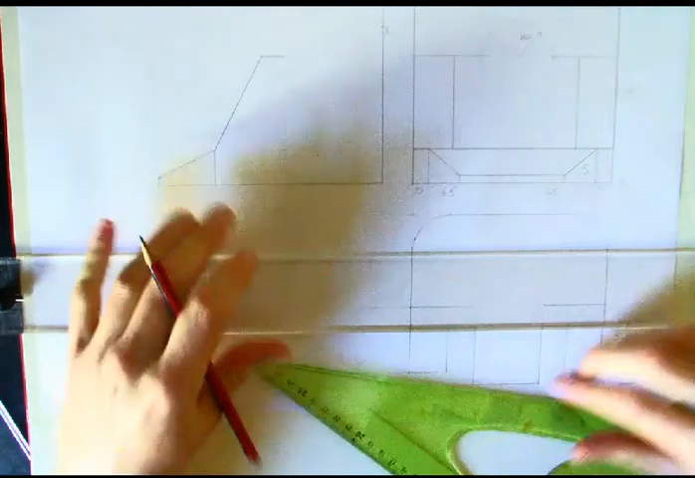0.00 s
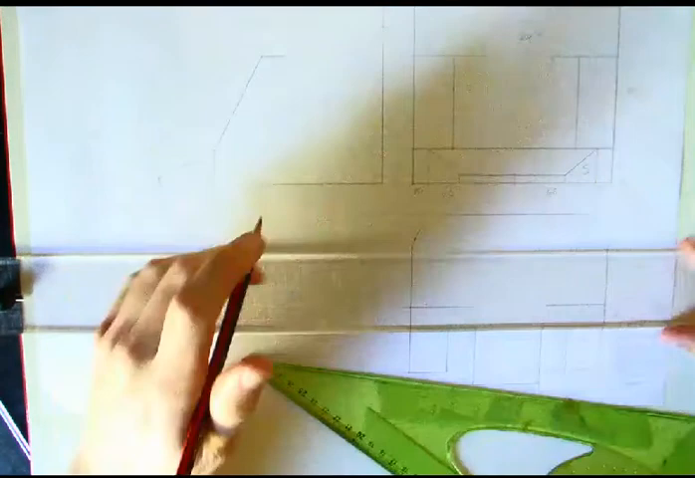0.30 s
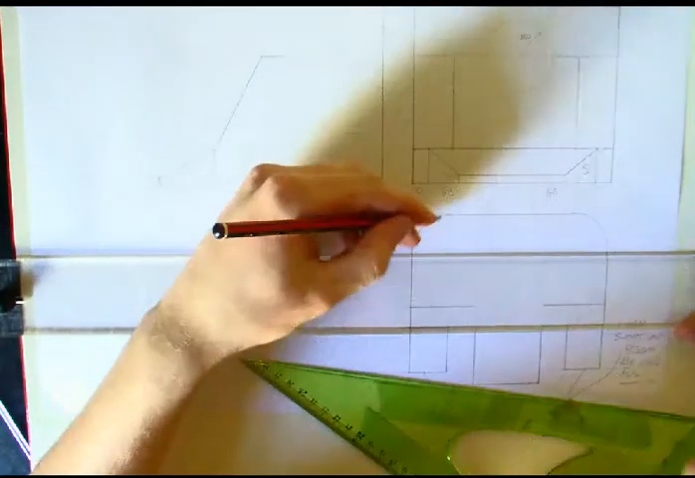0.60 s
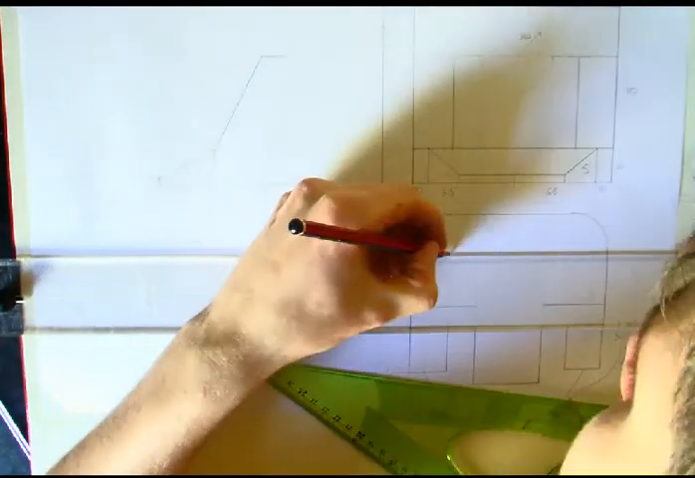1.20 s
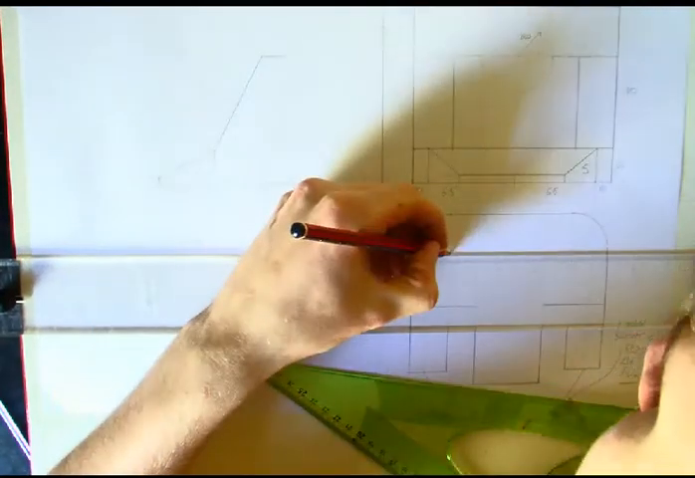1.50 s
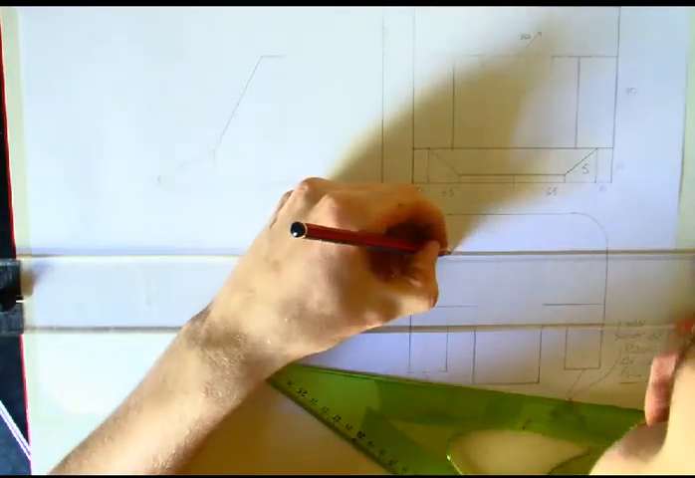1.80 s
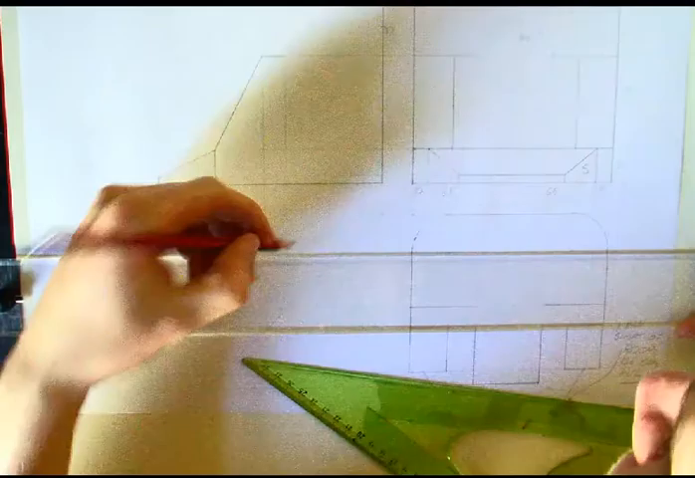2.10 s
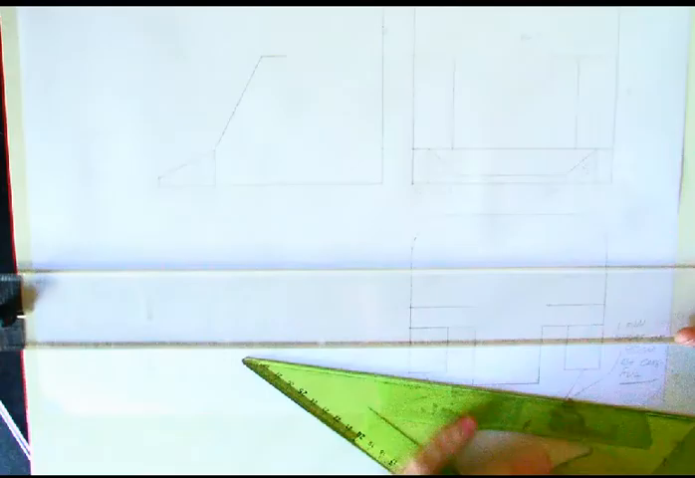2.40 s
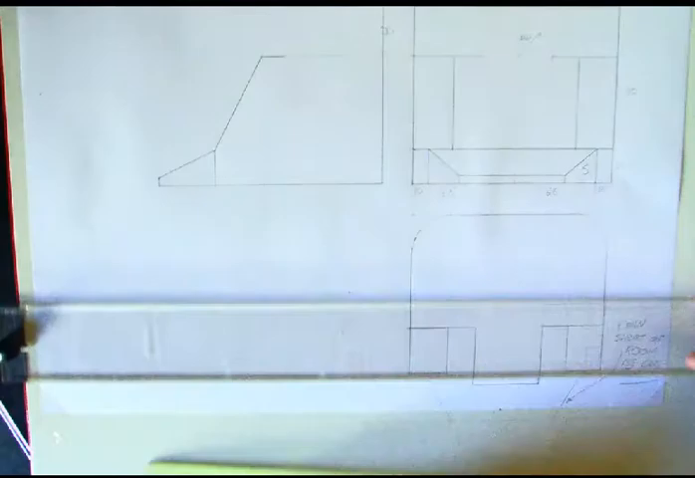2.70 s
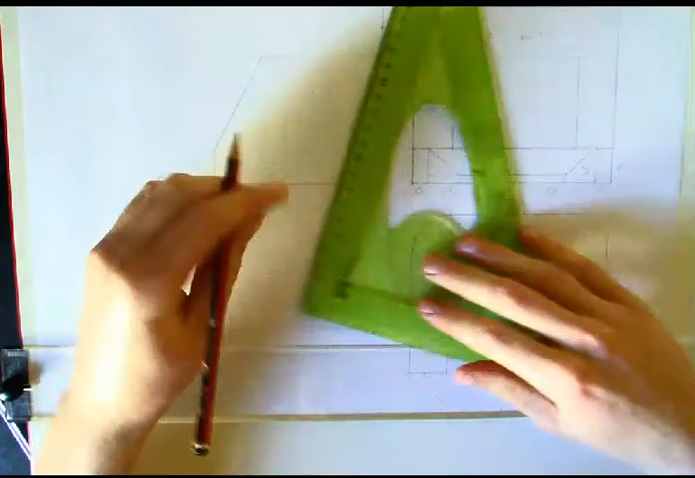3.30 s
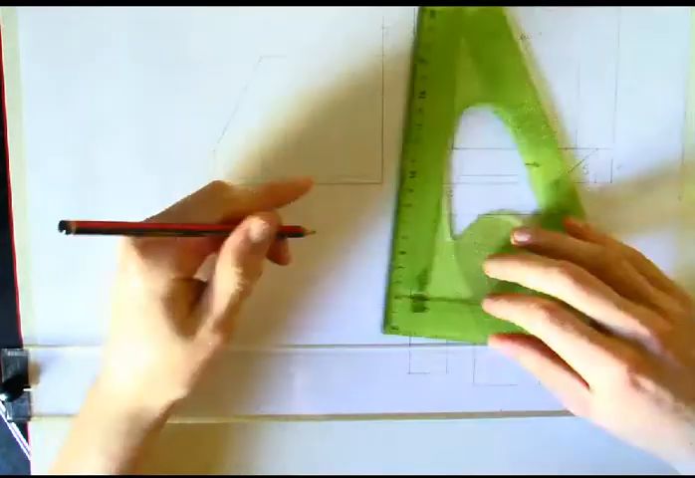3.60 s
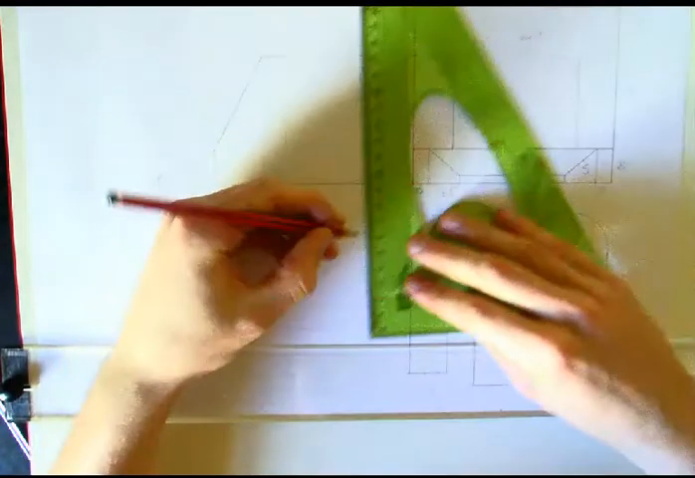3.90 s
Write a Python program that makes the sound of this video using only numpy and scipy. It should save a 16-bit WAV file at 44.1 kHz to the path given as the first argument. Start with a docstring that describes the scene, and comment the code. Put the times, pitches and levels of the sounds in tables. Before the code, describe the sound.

A plastic set square knocks on a drawing board right at the start, followed by faint ticks. A pencil softly scratches one short line around 2 seconds. From 2.4 seconds a hand brushes paper and a straightedge slides with a low rumble. The set square clacks three times between 3 and 3.3 seconds, scuffs at 3.6 and taps at 3.8. Faint room hum lies underneath.

```python
"""Drafting on a paper-covered wooden board in a small quiet room.
An instrument knocks on the board, exciting damped modes, and a few light ticks follow. A pencil draws one
short line, hissing by friction on the paper fibres. The hand brushes away and the straightedge slides down
as the board rumbles under the arm. A plastic set square is picked up, clacks down edge first and then
flat, and slides until it taps the straightedge. Room air, mains hum and a faint whine lie beneath it all."""
import sys
import numpy as np
from scipy import signal
from scipy.fft import rfft, irfft
from scipy.io import wavfile
from scipy.ndimage import uniform_filter1d

SR = 44100
rng = np.random.default_rng(int(sys.argv[2]) if len(sys.argv) > 2 else 0)


def file_out(sig):
    """Save sig as 16-bit WAV at sys.argv[1]."""
    # one column per channel
    cols = np.atleast_2d(sig).T
    # limit, then scale
    lim = np.clip(cols, -1, 1)
    pcm = np.round(lim * 32767).astype(np.int16)
    wavfile.write(sys.argv[1], SR, pcm)


N = 176400
TIME = np.arange(N) / SR


def from_db(db):
    """Amplitude ratio: a factor of ten for every 20 dB."""
    return 10 ** (np.asarray(db) / 20)


def at_hz(points, hz):
    """Interpolation of (frequency [Hz], value) points on a logarithmic frequency axis."""
    f, value = np.transpose(points)
    return np.interp(np.log(hz + 1e-6), np.log(f), value)


def level(points):
    """Amplitude envelope through (time [s], level [dB]) points, silent outside them."""
    s, db = np.transpose(points)
    return from_db(np.interp(TIME, s, db, left=-150, right=-150))


def rms_one(x):
    """Normalisation to unit rms."""
    return x / np.sqrt(np.mean(x ** 2) + 1e-20)


def coloured(x, spectrum):
    """Spectral shaping, normalised to unit rms."""
    return rms_one(irfft(rfft(x) * from_db(at_hz(spectrum, np.fft.rfftfreq(N, 1 / SR))), N))


def decay(t, t60):
    """Exponential damping: 60 dB in each t60, from t = 0."""
    return from_db(-60 * np.maximum(t, 0) / t60)


def resonate(x, bands):
    """Second-order resonances and antiresonances raise or lower narrow bands."""
    for hz, width_hz, db in bands:
        gain, alpha = from_db(db / 2), np.pi * width_hz / SR
        tuning = -2 * np.cos(2 * np.pi * hz / SR)
        numerator = [1 + alpha * gain, tuning, 1 - alpha * gain]
        x = signal.lfilter(numerator, [1 + alpha / gain, tuning, 1 - alpha / gain], x + 1e-18)
    return x


def add(out, s, sound):
    """Superposition of a sound starting at time s."""
    i = int(s * SR)
    out[i:i + len(sound)] += sound[:N - i]


# Dense, quickly damped modes: (frequency [Hz], third-octave gain [dB])
BODY_SPECTRUM = [(30, -9), (55, -5.5), (80, 2.5), (125, -18), (240, -7.5), (315, -6.5), (410, 4), (520, 2),
                 (800, 0.5), (1500, -1), (2000, -2.5), (4000, -3), (8000, -1.5), (11000, -0.5),
                 (15500, -11)]
# Their damping: (frequency [Hz], T60 [s])
BODY_DECAY = [(50, 0.12), (400, 0.11), (2500, 0.08), (12000, 0.031)]
# Reverberation: (frequency [Hz], level relative to the impact [dB])
ROOM_SPECTRUM = [(50, -7.5), (400, -15.5), (2500, -3), (12000, -5.5)]
# Reverberation time: (frequency [Hz], T60 [s])
ROOM_DECAY = [(50, 0.35), (400, 0.24), (2500, 0.19), (12000, 0.17)]


def impact(colour, chatter_s, modes, room_build_s=0.012, crack_s=0.0008):
    """Impulse response: a crack, overlapping modes as decaying noise, distinct modes and reverberation."""
    t = np.arange(SR // 2) / SR
    white = rng.standard_normal((2, 2, len(t) + SR // 4))
    flutter = from_db(-rms_one(uniform_filter1d(rng.standard_normal(len(t)), size=40)))  # 1 dB rms
    third_octaves = 1000 * 2 ** (np.arange(-15, 13) / 3)
    out = np.zeros(len(t))
    for k, hz in enumerate(third_octaves):
        band = signal.butter(2, [hz / 2 ** (1 / 6), hz * 2 ** (1 / 6)], "band", fs=SR, output="sos")
        body, room = signal.sosfilt(band, white[k % 2])[:, -len(t):]
        body = body / body[:SR // 25].std()
        body *= decay(t - chatter_s, at_hz(BODY_DECAY, hz))  # sustained while the contact chatters
        if hz >= 1000:
            body *= flutter
        room = rms_one(room) * from_db(at_hz(ROOM_SPECTRUM, hz))
        room *= (1 - np.exp(-t / room_build_s)) * decay(t, at_hz(ROOM_DECAY, hz))
        rise = 1 - np.exp(-t * max(hz, 200))  # time constant of one cycle, 5 ms at most
        out += from_db(at_hz(BODY_SPECTRUM, hz) + at_hz(colour, hz)) * rise * (body + room)
    crack_db = colour[-1][1] + 15
    out += from_db(crack_db) * rng.standard_normal(len(t)) * np.exp(-t / crack_s)
    onset = 1 - np.exp(-t / chatter_s)
    for hz, db, t60 in modes:
        amplitude = from_db(db + rng.normal(0, 0.53))
        out += amplitude * np.sin(2 * np.pi * (hz * t + rng.random())) * decay(t, t60) * onset
    return out


def fine_modes(colour, count=60, t60=0.15):
    """A thin plate has many high modes; each point of impact excites a different set."""
    pitches = rng.uniform(2500, 13000, count)
    scatter_db = 1.5 * np.clip(rng.standard_normal(count), -2, 2)
    dbs = -21.5 + at_hz(colour, pitches) + at_hz(BODY_SPECTRUM, pitches) + scatter_db
    return [(hz, db, t60) for hz, db in zip(pitches, dbs)]


def snap(db, centre_hz=3130, width_hz=3200, fade_s=0.0033):
    """A brief contact has a broad spectrum: the bright slap of plastic on paper."""
    t = np.arange(SR // 20) / SR
    peak = signal.iirpeak(centre_hz, centre_hz / width_hz, fs=SR)
    burst = signal.lfilter(*peak, rng.standard_normal(len(t)))
    burst = signal.sosfilt(signal.butter(2, 2 * centre_hz, fs=SR, output="sos"), burst)
    return from_db(db) * rms_one(burst) * np.exp(-t / fade_s)


# Blows on the board: (time [s], chatter [s], thump [dB], low-mid [dB], upper-mid [dB], treble [dB],
# top [dB], snap [dB], landing, mode favoured by the spot [Hz], its level [dB])
BLOWS = [ (0.0197, 0.0023, -64, -41.5, -41, -44, -64, -49, "edge", 1360, -50),
         (0.0225, 0.0056, -36, -45, -43, -44.5, -52.5, -33.5, "edge", 609, -36),
         (2.524, 0.0044, -51, -61, -61.5, -58, -71, -41.5, "flat", 1450, -54),
         (2.55, 0.0067, -53, -59.5, -55.5, -86, -74, -45, "flat", 2130, -52),
         (3.0232, 0.0017, -37.5, -39.5, -42, -39, -33, -37.5, "corner", 4390, -42),
         (3.1626, 0.0031, -31, -28, -24.5, -24.5, -34, -31, "edge", 394.4, -29),
         (3.252, .002, -56, -52.5, -51, -52, -53, -54, "corner", 2200, -64),
         (3.273, .003, -54, -58, -46, -37.5, -36, -46, "corner", 4200, -50),
         (3.2782, 0.0045, -27, -30.5, -27.5, -28, -34, -18, "flat", 431, -28.5),
         (3.7966, 0.0032, -47, -48.5, -48, -53, -50.5, -35.5, "corner", 1357, -40),
         (3.853, 0.0053, -56, -57.5, -58, -68, -62, -47, "edge", 465, -44)]
# Points of a blow's spectrum, two for each mid range: (frequency [Hz])
BLOW_BANDS = [100, 300, 1000, 1800, 4000, 9000, 14000]
# Set square modes, by landing: (frequency [Hz], T60 [s], corner gain [dB], edge gain [dB], flat gain [dB])
PLATE_MODES = [(221, 0.24, -5.5, -10, -9.5), (409, 0.071, -17.5, 3.5, -10), (475, 0.13, -1, -6, 7),
               (653, 0.11, 1, 4.5, -9), (986, 0.16, 2, 2, 3.5), (1240, 0.13, -1, 2, -1),
               (1897, 0.064, 3, 3.5, 9.5), (2020, 0.11, -15, -1.5, 4), (2370, .12, -15.5, -15, -2.5),
               (2490, .13, -13, -4, -9), (2720, 0.18, -23, -7, -3), (2890, .12, -8, -20, -0.5),
               (3125, .1, 2, -14, -16), (3421, 0.11, -10, -4, -26), (4150, 0.097, 0, -10, -15),
               (4446, .11, -5, -15, -2.5)]
# Gaps between the board's low resonances, and one peak: (frequency [Hz], bandwidth [Hz], gain [dB])
BOARD_RESPONSE = [(135, 36, -16), (339, 18, -9.5), (518, 74, -6), (810, 79, 6.5), (850, 170, -8),
                  (1067, 46, -3.5)]


def knocks(favoured_t60=0.2):
    """Modal excitation: the way an instrument lands on the board sets how strongly each mode rings."""
    out = np.zeros(N)
    for s, chatter_s, thump, low, upper, treble, top, snap_db, landing, ring_hz, ring_db in BLOWS:
        colour = list(zip(BLOW_BANDS, (thump, low, low, upper, upper, treble, top)))
        column = ("corner", "edge", "flat").index(landing)
        modes = [(hz, gains[column] + at_hz(colour, hz), t60) for hz, t60, *gains in PLATE_MODES]
        modes += fine_modes(colour) + [(ring_hz, ring_db, favoured_t60)]
        add(out, s, impact(colour, chatter_s, modes))
        add(out, s, snap(snap_db))
    return resonate(out, BOARD_RESPONSE)


def rub(envelope, colour, rough_db, rings=(), grains_per_s=3600, grain_share=0.52):
    """Stick-slip friction: paper fibres catch and let go, giving impulses on a hiss."""
    sizes = from_db(3 * np.minimum(rng.exponential(1, N), 4)) * rng.choice([-1, 1], N)
    grains = rms_one(sizes * (rng.random(N) < grains_per_s / SR))
    friction = np.sqrt(grain_share) * grains + np.sqrt(1 - grain_share) * rng.standard_normal(N)
    unsteady_pressure = coloured(rng.standard_normal(N), [(60, 0), (400, -60)])
    return level(envelope) * from_db(rough_db * unsteady_pressure) * coloured(resonate(friction, rings), colour)


# Scuff and glide of the set square: (time [s], level [dB])
SCUFF_LEVEL = [(3.36, -73), (3.43, -64.5), (3.49, -72), (3.53, -61.5), (3.576, -49.5), (3.586, -33.5),
               (3.598, -47), (3.63, -56), (3.68, -66), (3.78, -64.5), (3.83, -71)]
GLIDE_LEVEL = [(3.56, -81), (3.6, -55), (3.65, -59), (3.7, -63.5), (3.74, -62.5), (3.78, -53), (3.8, -56),
               (3.83, -71)]
# Their spectra: (frequency [Hz], relative level [dB])
SCUFF_SPECTRUM = [(150, 7), (320, -6), (450, -7), (1100, -6), (2000, -5), (3000, -5), (5000, -2),
                  (8000, -1.5), (11000, -0.5), (12500, -10), (16000, -22)]
GLIDE_SPECTRUM = [(500, -17), (2000, 0), (5000, -7), (8000, 2.5), (11000, -1.5), (16000, -9)]
# Resonances of the scuff: (frequency [Hz], bandwidth [Hz], gain [dB])
SCUFF_RESONANCES = [(223, 64, 8.6), (433, 27, 13), (1000, 49, 4.3), (1860, 110, 6.6), (2350, 140, 4.6),
                    (3140, 210, 16), (3970, 230, 17.7), (4960, 300, 11), (6170, 290, 10), (7800, 510, 5),
                    (8550, 300, 6), (9640, 400, 9.5)]


def set_square_slide():
    """Sliding friction: the plastic scuffs and resonates as it is pressed flat, then glides with a hiss."""
    scuff = rub(SCUFF_LEVEL, SCUFF_SPECTRUM, rough_db=1.4, rings=SCUFF_RESONANCES)
    return scuff + rub(GLIDE_LEVEL, GLIDE_SPECTRUM, rough_db=0.7)


# Scratch of the lead and drone of the board: (time [s], level [dB])
SCRATCH_LEVEL = [(1.84, -77), (1.89, -61.5), (1.96, -57.5), (2.03, -55.5), (2.065, -53), (2.09, -59),
                 (2.125, -77)]
DRONE_LEVEL = [(1.92, -79), (1.955, -57.5), (1.99, -64.5), (2.07, -62), (2.11, -75)]
# Their spectra: (frequency [Hz], relative level [dB])
SCRATCH_SPECTRUM = [(200, -3), (340, -8), (450, 4), (630, 7), (830, -6), (1050, -3.5), (2800, 0.5),
                    (4200, -5), (5800, -7), (9700, -2.5), (13000, -9.5), (16000, -11)]
DRONE_SPECTRUM = [(200, -30), (350, -20), (430, 3), (530, -8), (625, -1.5), (800, -24), (2000, -35),
                  (8000, -60)]
# Peaks and one dip in the scratch: (frequency [Hz], bandwidth [Hz], gain [dB])
SCRATCH_RESONANCES = [(1026, 78, 13), (1340, 150, 6), (2380, 100, 3), (3700, 150, -7), (4156, 180, 13),
                      (4400, 110, 0), (9400, 350, 5), (10300, 340, 5), (13300, 500, 7)]


def pencil():
    """Forced vibration: the lead scratches the paper and, once it bears down, drives the board."""
    scratch = rub(SCRATCH_LEVEL, SCRATCH_SPECTRUM, rough_db=0.8, rings=SCRATCH_RESONANCES)
    return scratch + rub(DRONE_LEVEL, DRONE_SPECTRUM, rough_db=3.0)


# Slide of the straightedge: (time [s], level [dB])
STRAIGHTEDGE_LEVEL = [(2.42, -73), (2.52, -58), (2.56, -61.5), (2.61, -61), (2.68, -53.5), (2.73, -53.5),
                      (2.75, -51), (2.79, -57.5), (2.84, -72)]
# Its spectrum: (frequency [Hz], relative level [dB])
STRAIGHTEDGE_SPECTRUM = [(150, 1.5), (330, -17), (460, 7), (560, -8), (680, 3.5), (830, -10), (1000, -4.5),
                         (1600, -13.5), (2800, -18), (5000, -26), (16000, -31)]


def straightedge():
    """Sliding friction, strongest below 1 kHz, as the straightedge moves down the board."""
    return rub(STRAIGHTEDGE_LEVEL, STRAIGHTEDGE_SPECTRUM, rough_db=1.2)


# Brushing of hand and fingers: (time [s], level [dB])
HAND_LEVEL = [(2.2, -82), (2.385, -68), (2.4, -50), (2.425, -56.5), (2.445, -57.5), (2.5, -61.5),
              (2.58, -55.5), (2.64, -62), (2.78, -78), (2.86, -77)]
FINGER_LEVEL = [(3.39, -85), (3.43, -65.5), (3.5, -72), (3.54, -54), (3.59, -58), (3.63, -68), (3.69, -70),
                (3.76, -68), (3.8, -70)]
# Their spectra: (frequency [Hz], relative level [dB])
HAND_SPECTRUM = [(150, -4), (600, -4), (1300, -2), (2500, 3), (5000, -2.5), (10000, -3), (16000, -12)]
FINGER_SPECTRUM = [(200, -23), (450, -3), (1000, -3.5), (1900, -1), (3000, -12.5), (6000, -25),
                   (16000, -35)]


def hand():
    """Friction of skin on paper: the hand brushes away, and later the fingers push the set square."""
    return rub(HAND_LEVEL, HAND_SPECTRUM, rough_db=2.1) + rub(FINGER_LEVEL, FINGER_SPECTRUM, rough_db=2.0)


# Rumble of the board: (time [s], level [dB])
RUMBLE_LEVEL = [(0, -52), (.2, -54.5), (.3, -66), (2.37, -71.5), (2.405, -41), (2.44, -47), (2.47, -45),
                (2.55, -55), (2.76, -69), (2.85, -68)]
# Its spectrum: (frequency [Hz], relative level [dB])
RUMBLE_SPECTRUM = [(20, -5), (45, 0), (75, 1.5), (115, -7), (170, -18.5), (400, -28), (2000, -77)]


def arm_rumble():
    """Low-frequency forced vibration of the board under the weight of the arm."""
    return level(RUMBLE_LEVEL) * coloured(rng.standard_normal(N), RUMBLE_SPECTRUM)


# Touches of pencil and fingers: (time [s], low level [dB], mid level [dB], treble level [dB])
TOUCHES = [(0.133, -80, -82, -71), (.2535, -76, -64, -70.5), (.662, -84, -71, -76), (0.797, -76, -65, -80),
           (1.045, -67, -78, -83), (1.5606, -68.5, -58.5, -72), (2.191, -78, -68, -71),
           (2.461, -70, -68.5, -70), (3.51, -68, -74, -63), (3.56, -71, -58, -63)]
# Points of a touch's spectrum: (frequency [Hz])
TOUCH_BANDS = [400, 2000, 8000]


def ticks():
    """Weak impacts excite only the quickly damped modes, so the board does not ring."""
    out = np.zeros(N)
    for s, *dbs in TOUCHES:
        add(out, s, impact(list(zip(TOUCH_BANDS, dbs)), chatter_s=0.0012, modes=[]))
    return out


# Echoes from surfaces near the microphone: (delay [s], gain [dB])
ECHOES = [(.0021, -23.5), (.0047, -15.5), (.0076, -20.5)]


def reflected(x):
    """Comb filtering: faint early reflections interfere with the direct sound and ripple its spectrum."""
    out = x.copy()
    for delay_s, db in ECHOES:
        add(out, delay_s, from_db(db) * x)
    return out


# Subsonic sway of the air: (time [s], level [dB])
SWAY_LEVEL = [(0, -43), (2.7, -48), (2.95, -32.5), (3.4, -46), (3.7, -37), (4, -39)]
# Spectra of the sway and of the steady air: (frequency [Hz], relative level [dB])
SWAY_SPECTRUM = [(1, -8), (3, 9), (6, 9.5), (12, -26.5), (25, -47), (100, -76.5), (400, -120)]
AIR_SPECTRUM = [(12, -21.5), (20, 1.5), (27, -15.5), (59, -15.5), (80, -31.5), (153, -24.5), (175, -32.5),
                (252, -28.5), (274, -35.5), (393, -34.5), (581, -37), (2610, -45), (15500, -50)]


def room_air():
    """Ambient noise: random pressure fluctuations make a steady rumble and hiss over a subsonic sway."""
    air = from_db(-55) * coloured(rng.standard_normal(N), AIR_SPECTRUM)
    return air + level(SWAY_LEVEL) * coloured(rng.standard_normal(N), SWAY_SPECTRUM)


# Mains harmonics: (frequency [Hz], rms level [dB])
HUM_LINES = [(50, -63), (100, -75.5), (150, -71), (250, -77)]


def mains_hum():
    """A line spectrum at multiples of the supply frequency."""
    return sum(from_db(db) * np.sqrt(2) * np.sin(2 * np.pi * (hz * TIME + rng.random()))
               for hz, db in HUM_LINES)


def whine(hz=8040, peak_db=-71, period_s=0.1437, pulse_at_s=0.195, width_s=0.0094):
    """Amplitude modulation: a faint electrical tone comes in regular Gaussian pulses."""
    from_pulse = (TIME - pulse_at_s + period_s / 2) % period_s - period_s / 2
    return from_db(peak_db) * np.exp(-(from_pulse / width_s) ** 2) * np.sin(2 * np.pi * hz * TIME)


def scene():
    """Superposition of all sources at one microphone above the board."""
    drafting = knocks() + set_square_slide() + pencil() + straightedge() + hand() + arm_rumble() + ticks()
    return (reflected(drafting) + room_air() + mains_hum() + whine())[None]


def record(dry):
    """Band limiting: a steep elliptic low-pass removes the treble above 15850 Hz."""
    return signal.sosfilt(signal.ellip(12, .2, 80, 15850, fs=SR, output="sos"), dry)


dry = scene()
out = record(dry)
file_out(out)
```